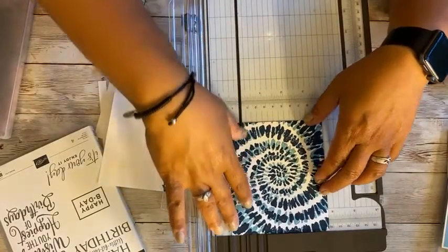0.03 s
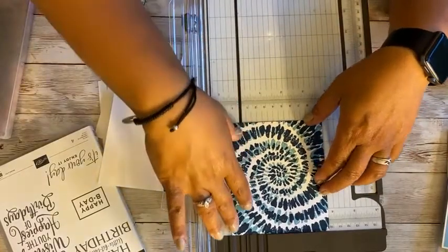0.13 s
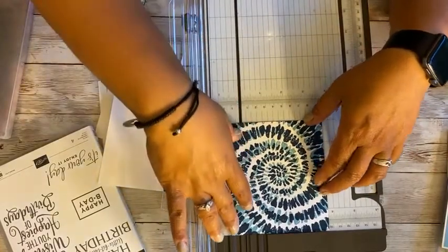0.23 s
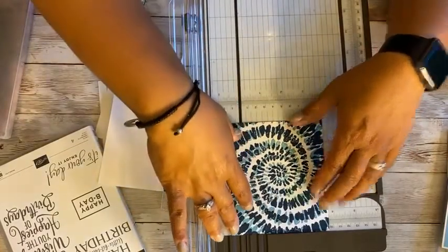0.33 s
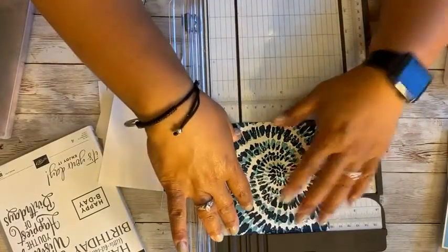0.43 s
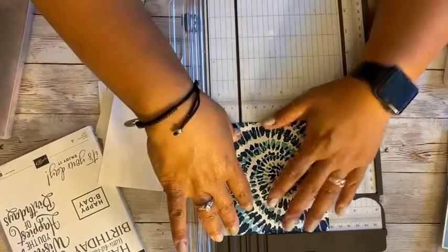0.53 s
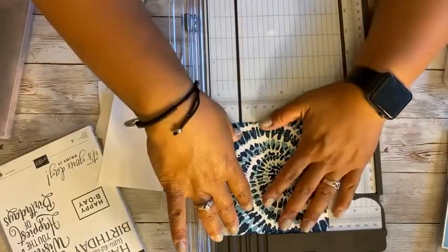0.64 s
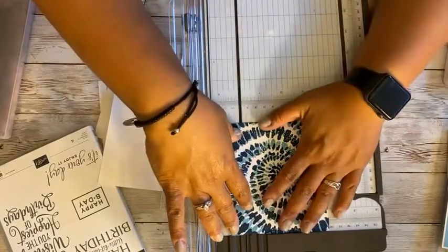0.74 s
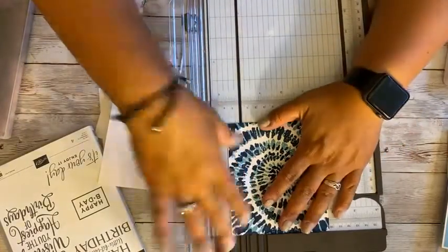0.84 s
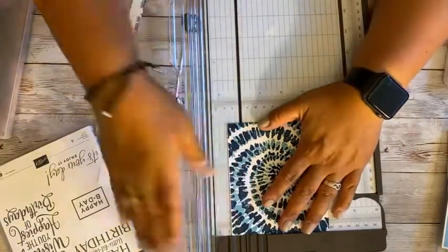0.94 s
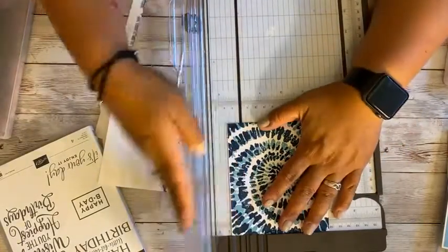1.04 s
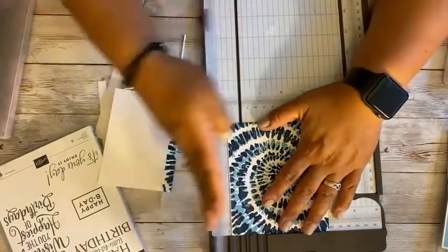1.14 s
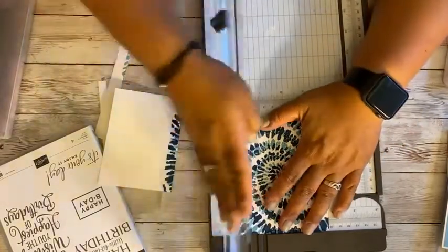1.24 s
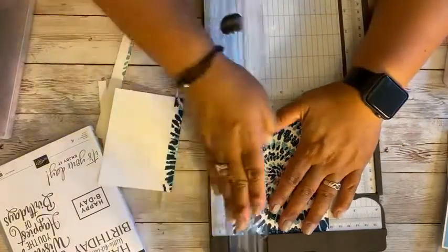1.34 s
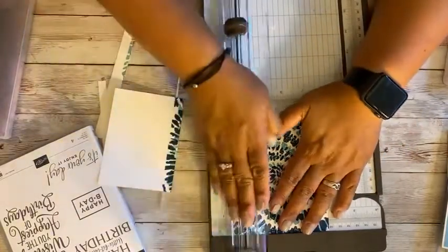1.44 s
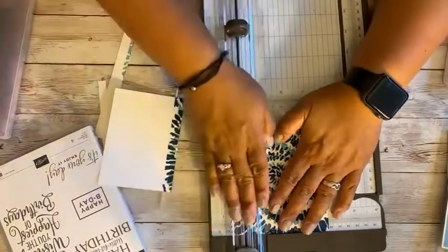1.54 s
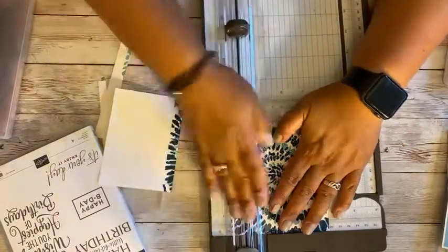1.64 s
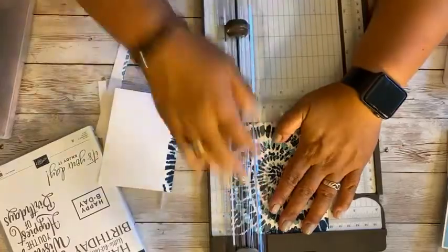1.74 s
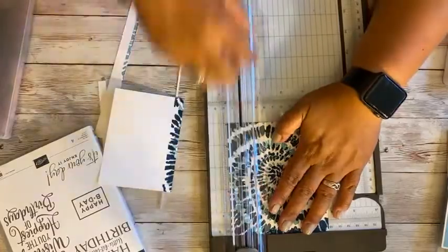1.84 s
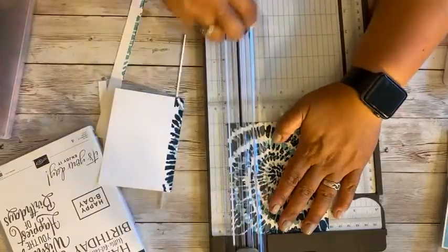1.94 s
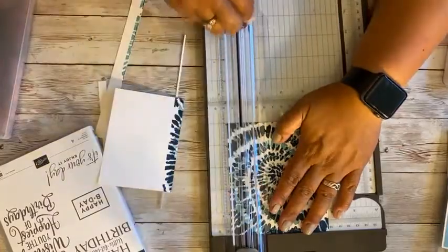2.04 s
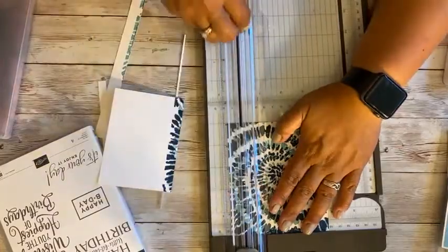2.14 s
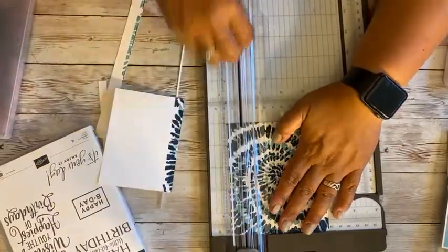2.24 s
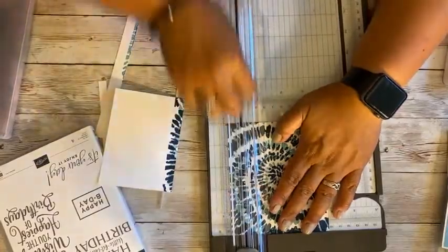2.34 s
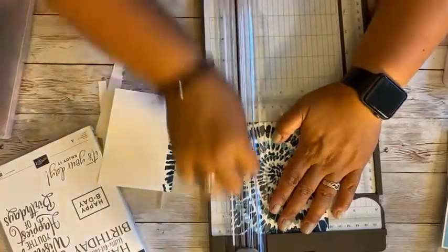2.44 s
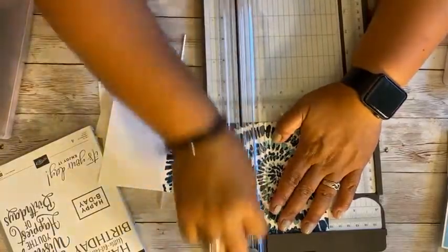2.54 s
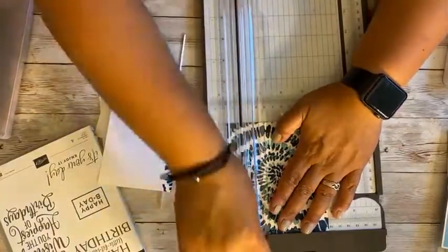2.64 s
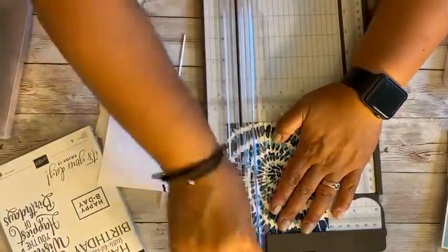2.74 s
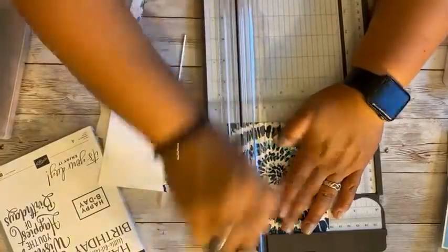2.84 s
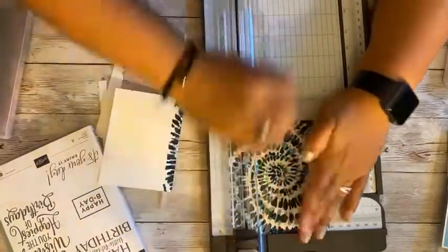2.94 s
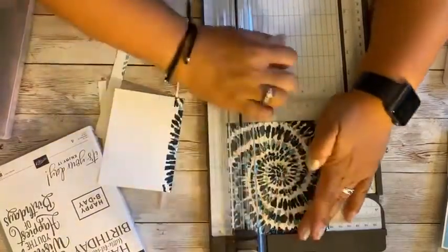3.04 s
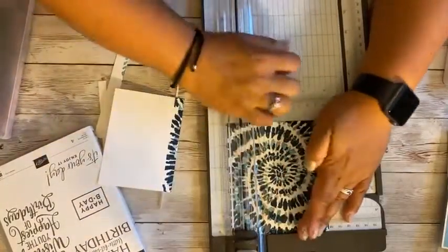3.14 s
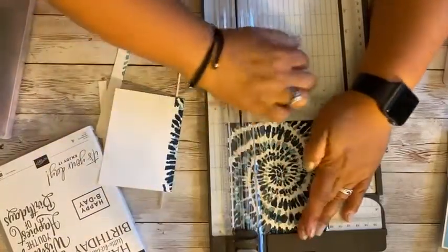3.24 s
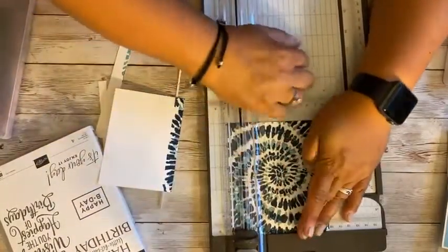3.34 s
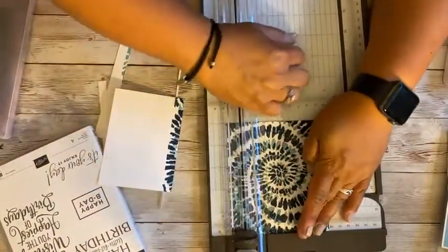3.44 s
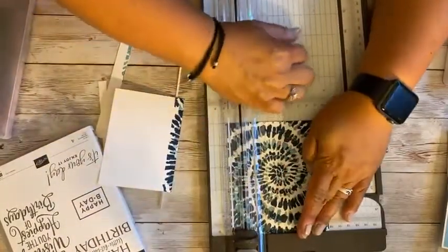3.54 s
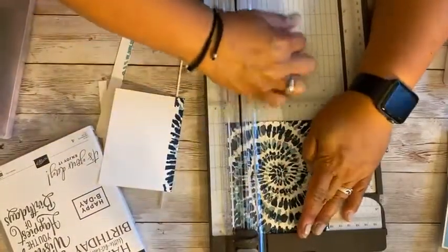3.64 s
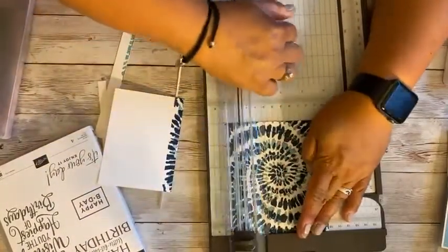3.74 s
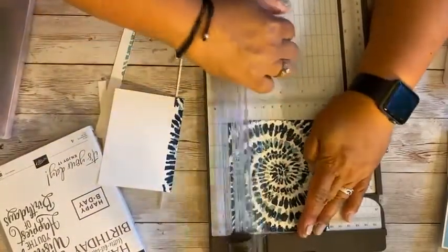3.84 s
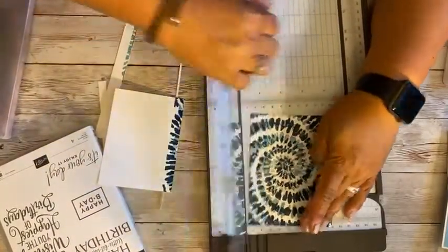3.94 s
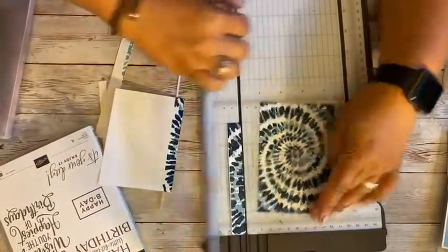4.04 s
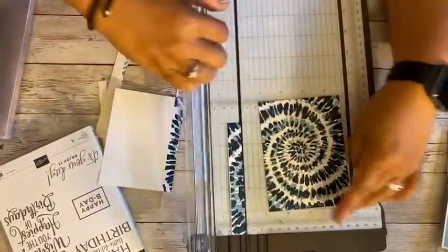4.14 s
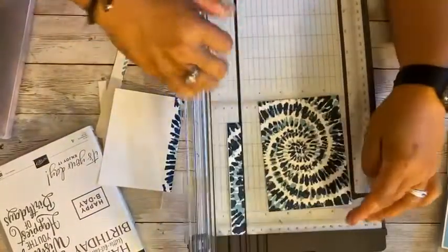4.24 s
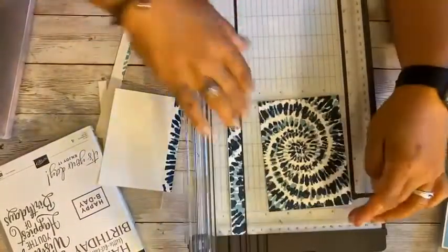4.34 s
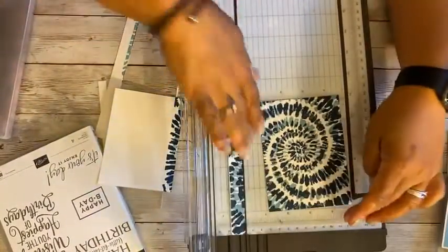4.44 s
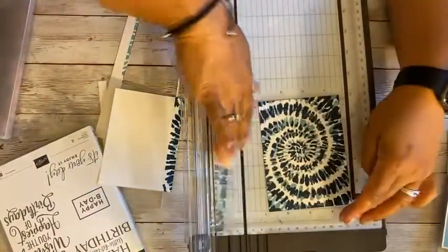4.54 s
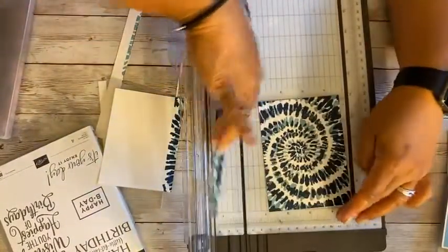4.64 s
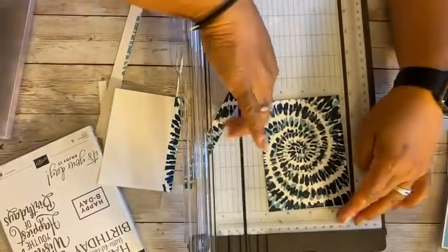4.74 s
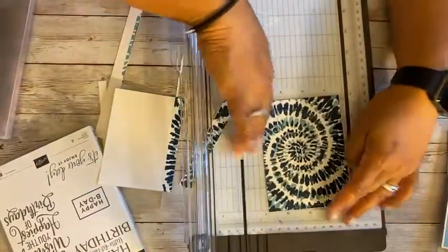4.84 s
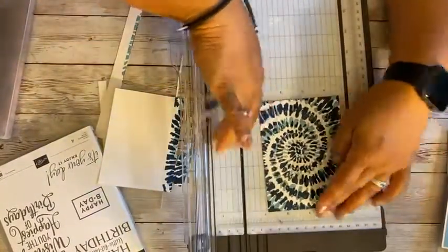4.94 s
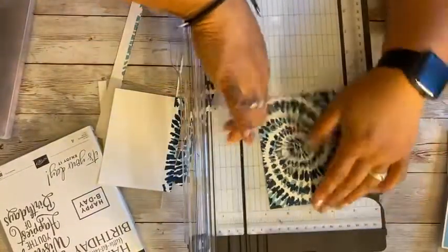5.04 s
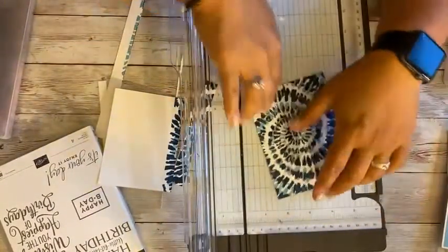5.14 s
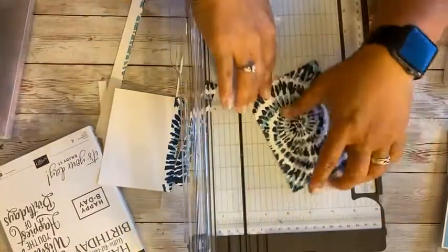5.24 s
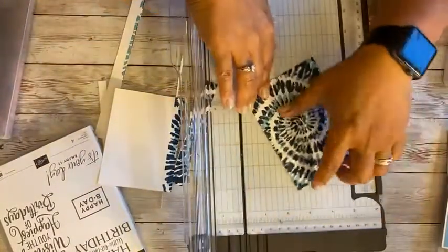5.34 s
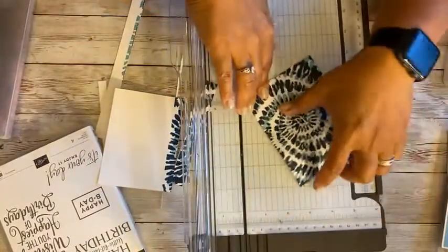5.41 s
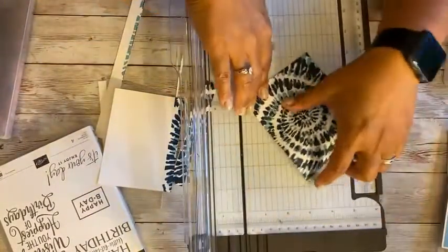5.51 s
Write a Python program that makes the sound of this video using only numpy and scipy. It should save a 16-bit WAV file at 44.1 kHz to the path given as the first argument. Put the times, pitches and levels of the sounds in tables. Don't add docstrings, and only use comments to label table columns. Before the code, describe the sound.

A plastic paper trimmer's guide arm rattles and slams down, a blade scrapes briskly through card, then plastic clacks and card rustles in a quiet room.

```python
import sys
import numpy as np
from scipy import signal
from scipy.fft import rfft, irfft
from scipy.io import wavfile
from scipy.ndimage import uniform_filter1d

SR = 44100
rng = np.random.default_rng(int(sys.argv[2]) if len(sys.argv) > 2 else 0)


def decibels_to_gain(level_db):
    exponent = np.asarray(level_db, float) / 20
    return 10 ** exponent


def transcribe(signal):
    frames = np.atleast_2d(signal).T
    limited = np.clip(frames, -1, 1)
    pcm = np.round(limited * 32767).astype(np.int16)
    wavfile.write(sys.argv[1], SR, pcm)


N = 245962


def band(x, hz, width):
    return signal.lfilter(*signal.iirpeak(min(hz, 0.45 * SR), hz / width, SR), x)


def wide_band(x, hz, width):
    return band(band(x, hz, width), hz, width)


def unit(x):
    return x / np.sqrt(np.mean(x ** 2))


def walk(rate):
    hold = int(SR / rate)
    levels = np.repeat(rng.standard_normal(N // hold + 1), hold)
    return 0.95 * uniform_filter1d(levels, hold)[:N]


def grit(per_s, spread_db):
    chance, luck = rng.random((2, N))
    size_db = np.minimum(-spread_db * np.log(1 - luck), 3 * spread_db)
    size = (chance < per_s / SR) * decibels_to_gain(size_db)
    push = size * rng.choice([-1, 1], size=(4, N))
    for lag in (5, 13):
        taps = np.r_[0.6, np.zeros(lag - 1), 1]
        push = signal.lfilter(taps, taps[::-1], push)
    return unit(push)


def body(x, modes, top_hz):
    ring, power = 0, 0
    for k, (hz, width, db) in enumerate(modes):
        ring = ring + (-1) ** k * decibels_to_gain(db) * band(x, hz, width)
        power += decibels_to_gain(db) ** 2 * np.pi * width / SR
    return signal.lfilter(*signal.butter(1, top_hz, fs=SR), ring) / np.sqrt(power)


# (frequency [Hz], width [Hz], level [dB])
BASE_MODES = [(120, 56, -1.5), (211, 45, 3), (330, 89, 0), (507, 140, -1.5), (628, 42, 4), (864, 310, -1.5)]


def trimmer(force, modes, bright_modes, hiss_hz):
    touched = body(force[0], modes, 4500)
    rim = body(force[1], bright_modes, 7300)
    edge = 0.69 * wide_band(force[2], hiss_hz, hiss_hz)
    base = body(force[3], BASE_MODES, 730)
    return touched + rim + edge + base


def strokes(rows, hiss_db, rumble_db):
    gain, t = np.zeros((4, N + SR)), np.arange(-SR // 2, SR // 2) / SR
    for s, db, swell_s, fade_s, bright_db in rows:
        under = -20 * np.maximum(-t / swell_s, t / fade_s)
        hiss = 0.83 * under + hiss_db + 1.5 * bright_db
        rumble = 0.71 * under + rumble_db - 0.15 * bright_db
        start = int(s * SR)
        gain[:, start:start + SR] += decibels_to_gain(db + np.array([under, under + bright_db, hiss, rumble]))
    return gain[:, SR // 2:SR // 2 + N]


# (frequency [Hz], width [Hz], level [dB])
SLIDE_MODES = [(3180, 970, 3.5), (4540, 2700, 6), (6660, 13000, -4)]


def scrape(gain, modes, hiss_hz, per_s, spread_db, flicker_db):
    force = gain * grit(per_s, spread_db) * decibels_to_gain(flicker_db * walk(70))
    return trimmer(force, modes, SLIDE_MODES, hiss_hz)


def rings(blows, push_s):
    out, t = np.zeros(N + SR), np.arange(SR // 4) / SR
    for s, db, hz, t60, partner_db in blows:
        push = rng.standard_normal(len(t)) * t * np.exp(-t / push_s)
        width = np.log(1000) / (np.pi * t60)
        ring = band(push, hz, width)
        ring += decibels_to_gain(partner_db) * band(push, 0.74 * hz, width)
        ring += 0.65 * band(push, 1.2 * hz, width)
        start = int((s - push_s / 2) * SR)
        out[start:start + len(t)] += decibels_to_gain(db) * ring / np.abs(ring).max()
    return out[:N]


# (frequency [Hz], level per Hz [dB])
HUM_COLOUR = [(15, -61), (25, -41.5), (55, -4.5), (113, -3.5), (193, -4.5), (240, -4.5), (411, -9),
              (704, -11), (805, -13), (946, -14.5), (2240, -23), (5740, -23.5), (15500, -38)]
# (time [s], level [dB])
HUM_DUCKING = [
    (0, 0.9),
    (1.55, 2.4),
    (1.902, -0.5),
    (2.45, 3.5),
    (3.05, 3.5),
    (4.449, 1),
    (5.58, 2.5),
]


def hum():
    hz, db = np.transpose(HUM_COLOUR)
    f = np.arange(N // 2 + 1) * SR / N + 1
    colour = decibels_to_gain(np.interp(np.log(f), np.log(hz), db))
    air = irfft(rfft(rng.standard_normal(N)) * colour, N)
    waver = band(air, 200, 500) * (decibels_to_gain(1.5 * walk(6)) - 1)
    ducking = np.interp(np.arange(N) / SR, *np.transpose(HUM_DUCKING))
    return decibels_to_gain(-70.5 + ducking) * unit(air + waver)


# (crest time [s], peak level [dB], swell [s], fade [s])
FINGER_WHISKS = [
    (.13, -77, .05, 0.14),
    (1.8, -65.5, 0.041, 0.06),
    (2.075, -68.5, .03, 0.055),
    (2.6, -64.5, 0.12, 0.19),
    (3.69, -57.5, .02, 0.032),
    (4.11, -76, .1, 0.17),
    (4.648, -66.5, 0.124, 0.072),
    (5.045, -74, 0.022, .04),
    (5.135, -69, .05, .06),
]


def whisks():
    gain = strokes([(*whisk, 0) for whisk in FINGER_WHISKS], 0, 0)[0]
    hiss = wide_band(rng.standard_normal(N), 11300, 13000)
    return gain * unit(hiss) * decibels_to_gain(2.0 * walk(40))


# (frequency [Hz], width [Hz], level [dB])
CARD_MODES = [(1236, 490, 6.3), (2040, 1510, 5)]
# (crest time [s], peak level [dB], swell [s], fade [s], brightness [dB])
CARD_RUSTLES = [(.146, -74.5, 0.093, 0.084, 8.5), (.25, -79.5, 0.16, 0.5, -5), (.76, -81.5, .03, .05, 8),
                (.914, -75.5, 0.053, 0.028, 9), (1.032, -81, 0.04, 0.054, 9.5),
                (1.745, -71, .02, 0.0466, 8), (1.792, -59.5, 0.037, 0.067, 1.5),
                (4.035, -62.5, 0.045, 0.066, -13), (4.105, -64.5, 0.11, 0.077, 3.5),
                (4.165, -63, 0.057, .12, -9), (4.262, -56.5, 0.0417, 0.068, -3),
                (4.335, -62, 0.09, 0.058, -14), (4.606, -70, 0.034, 0.054, 5.5),
                (4.648, -73.5, 0.037, 0.058, 10.5), (4.69, -58.5, 0.043, 0.035, -37),
                (4.81, -76, 0.278, 0.14, 5.5), (5.038, -58.5, 0.025, 0.047, 0.5),
                (5.108, -69.5, 0.059, .07, 0), (5.14, -77.5, .03, 0.045, 7), (5.3, -71, 0.094, 0.14, -2),
                (5.4, -76, 0.0099, .03, -16), (5.435, -80, 0.056, 0.041, -16.5),
                (5.47, -84, 0.13, .2, 11.5), (5.545, -66, 0.05, 0.23, 4.5)]


def rustles():
    gain = strokes(CARD_RUSTLES, hiss_db=-10.5, rumble_db=-3)
    return scrape(gain, CARD_MODES, hiss_hz=8856, per_s=5000, spread_db=4.0, flicker_db=3.0)


# (time [s], peak level [dB], ring [Hz], ring t60 [s])
CARD_FLICKS = [(.9158, -68, 1384, 0.04), (1.21, -46, 1950, 0.017), (1.598, -21, 4510, .01),
               (1.606, -24.5, 5300, 0.013), (1.597, -24, 1710, .015), (1.7885, -48, 1070, 0.018),
               (2.1813, -52, 1170, .021), (2.2687, -66.5, 1020, 0.024), (2.7462, -30.5, 3860, 0.021),
               (2.9073, -39.5, 1320, 0.0087), (3.4057, -61, 6350, .012), (3.464, -59.5, 6470, 0.0103),
               (3.481, -65, 6300, .012), (3.553, -46.5, 930, .012), (3.683, -39.5, 3320, 0.0103),
               (3.857, -36.5, 1360, 0.049), (3.934, -49, 3300, .007), (4.0344, -53, 1710, 0.011),
               (4.0744, -55, 1720, 0.047), (4.1044, -54.5, 2200, 0.027), (4.152, -54, 1900, 0.047),
               (4.1794, -59, 1970, .025), (4.3218, -55, 1250, 0.056), (4.5954, -53.5, 1950, 0.016),
               (5.0335, -53.5, 1410, .025)]


def flicks():
    return rings([(*flick, -18) for flick in CARD_FLICKS], push_s=0.0045)


# (frequency [Hz], width [Hz], level [dB])
ARM_MODES = [(850, 150, 3), (926, 240, 4), (1432, 1340, 7.5), (1725, 1300, -3.5), (2100, 1400, -11)]
RAIL_MODES = [(2820, 1700, -7), (3487, 530, 3), (3960, 460, 4), (4410, 670, 5), (5400, 880, 3.5),
              (6650, 2700, -2)]
# (time [s], arm peak level [dB], base share [dB], rail share [dB], dying t60 [s])
ARM_TAPS = [(1.1603, -45.5, -29, -23, 0.44), (1.3468, -56, 6.5, -10, 0.122), (1.585, -34.5, -9.5, -1, 0.23),
            (2.05, -52.5, -8, -10.5, 0.145), (2.1812, -62, -17.5, -15, 0.12), (2.7385, -35.5, -2, 7, 0.21),
            (2.8965, -44.5, -3, 0, 0.23), (3.1301, -46.5, 7, -4.5, 0.246), (3.279, -43.5, -9, -10, 0.27),
            (3.5474, -40.5, -3, -12.5, 0.13), (3.6229, -50.5, 0.5, -11, 0.68),
            (3.673, -37, -9.5, -1.5, 0.18), (4.2576, -48, -18.5, -21, 0.18), (4.586, -57, -18, -8, .15),
            (4.678, -51, -8, -4.5, .12), (5.0335, -55.5, -8.5, -7, .12), (5.096, -60, -10, -9, 0.18)]
ARM_LANDINGS = [
    (1.574, -30, -6, -1, 0.26),
    (1.588, -21.5, -5.5, 2.5, .12),
    (1.772, -47.5, -7.5, 1, 0.13),
    (2.044, -45, 1.5, -1.5, 0.23),
]


def clacks():
    force, t = np.zeros((4, N + SR)), np.arange(SR // 2) / SR
    for blows, rise_s in ((ARM_TAPS, 0.0032), (ARM_LANDINGS, 0.0258)):
        for s, db, base_db, rail_db, t60 in blows:
            rise = np.minimum(t / rise_s, 1) ** 2
            decay = decibels_to_gain(-60 * np.maximum(t - rise_s, 0) / t60)
            shares = decibels_to_gain([[0], [rail_db], [rail_db - 24.5], [base_db]])
            start = int((s - 0.003) * SR)
            force[:, start:start + len(t)] += decibels_to_gain(db - 4.0) * shares * rise * decay
    edge_lag_s = 0.006
    lag = np.exp(-1 / (edge_lag_s * SR))
    force[2] = signal.lfilter([1 - lag], [1, -lag], force[2])
    force = force[:, :N] * grit(per_s=8000, spread_db=2.0) * decibels_to_gain(0.66 * walk(180))
    return trimmer(force, ARM_MODES, RAIL_MODES, 8000)


# (crest time [s], peak level [dB], swell [s], fade [s], brightness [dB])
PLASTIC_DRAGS = [(1.17, -49.5, 0.0058, 0.24, -13), (1.201, -55, 0.057, 0.055, -7),
                 (1.26, -59.5, .04, 0.0167, -8), (1.3, -89, .05, 0.057, -12.5),
                 (1.35, -84, 0.0195, 0.049, 20), (1.552, -69, 0.03, 0.12, 6.5),
                 (2.09, -70, .01, 0.081, 2.5), (2.182, -62, 0.063, 0.076, -43), (2.27, -82, 0.069, .1, -13),
                 (3.29, -44.5, 0.005, 0.12, -3.5), (3.344, -52.5, 0.036, 0.055, -20),
                 (2.69, -61, 0.11, 0.13, -33), (3.54, -63, 0.113, 0.0149, -3),
                 (3.602, -59.5, 0.12, 0.29, -5), (3.74, -84.5, 0.0134, 0.18, -9.5),
                 (3.8, -52, 0.021, 0.16, -14), (3.862, -42, 0.076, 0.074, -3), (3.94, -67, 0.027, 0.11, 4),
                 (3.46, -70, 0.017, 0.12, -2)]


def drags():
    gain = strokes(PLASTIC_DRAGS, hiss_db=-22.5, rumble_db=-8)
    return scrape(gain, ARM_MODES, hiss_hz=7500, per_s=7000, spread_db=3.0, flicker_db=3.1)


# (time [s], peak level [dB], frequency [Hz])
TABLE_BOOMS = [(1.187, -58, 98), (1.601, -64, 86.8), (1.603, -45.5, 216), (2.751, -76, 88),
               (3.13, -55, 218), (3.68, -65, 111.5), (3.851, -68, 89), (4.998, -64.5, 96.7),
               (3.331, -66, 96), (3.79, -61, 170), (4.69, -67, 110), (5.299, -66, 132), (2.505, -59.5, 192)]


def booms():
    out, t = np.zeros(N + SR), np.arange(SR // 4) / SR
    for s, db, hz in TABLE_BOOMS:
        swell = t * hz / 3 * np.exp(1 - t * hz / 3)
        swing = np.sin(2 * np.pi * hz * t) + 0.31 * np.sin(2 * np.pi * 0.3 * hz * t)
        start = int(s * SR)
        out[start:start + len(t)] += decibels_to_gain(db) * swell * swing
    return out[:N]


# (time [s], peak level [dB], ring [Hz], ring t60 [s], lower partner level [dB])
BASE_KNOCKS = [(1.188, -73.5, 113, 0.06, -12.5), (1.6, -24, 588, 0.02, -41), (2.062, -50, 620, 0.06, -18.5),
               (2.747, -42, 476, 0.079, -5), (3.132, -35, 658, 0.038, -13),
               (3.331, -36.5, 378.7, 0.13, -12), (2.748, -38, 290, 0.066, -8),
               (3.681, -49.5, 490, 0.11, -16), (3.829, -45.5, 600, 0.078, -27.5),
               (4.254, -46, 185, 0.028, -7), (4.678, -48, 230, 0.139, 4), (4.971, -56, 129, 0.076, -10),
               (5.287, -52, 132, 0.018, -9.5), (5.42, -55, 750, 0.03, 0), (3.133, -38, 377, 0.091, -7),
               (3.155, -48, 427, 0.051, 1), (3.8, -52, 194.4, .12, -20), (4.785, -59.5, 281, 0.054, -9),
               (5.435, -52.5, 249, 0.054, -3), (4.995, -55, 167, 0.098, -14.5)]


def knocks():
    return rings(BASE_KNOCKS, push_s=0.004)


SLAM_CRACK_S = [
    1.603,
    1.6093,
    1.616,
]
SLAM_CRACK_DB = [-19, -15, -19]


def slam_cracks():
    cracks = np.zeros(N)
    cracks[(np.array(SLAM_CRACK_S) * SR).astype(int)] = -decibels_to_gain(np.array(SLAM_CRACK_DB))
    return 5.5 * wide_band(cracks, 3000, 6000)


# (frequency [Hz], width [Hz], level [dB])
BLADE_MODES = [(1300, 1430, -25), (1850, 280, -16.5), (2170, 630, -26)]
# (time [s], pressure level [dB], rail share [dB])
BLADE_CUT = [
    (2.44, -82.5, 13),
    (2.496, -68, 7),
    (2.512, -46, -0.5),
    (2.562, -47, 4.5),
    (2.63, -48.5, 5),
    (2.698, -50, 5.5),
    (2.736, -52, 10.5),
    (2.767, -64, 14),
]


def cut():
    t = np.arange(N) / SR
    s, db, rail_db = np.transpose(BLADE_CUT)
    on = np.clip(np.minimum(t - s[0], s[-1] - t) / 0.0033, 0, 1)
    pressure = on * decibels_to_gain([np.interp(t, s, db + share_db) for share_db in (0, rail_db, -1.5, -9)])
    return scrape(pressure, BLADE_MODES, hiss_hz=7680, per_s=14000, spread_db=4.5, flicker_db=0.95)


def room(x):
    t60, level_db = 0.14, -9
    t = np.arange(SR // 2) / SR
    tail = rng.standard_normal(len(t)) * (t > 0.004)
    dull = signal.lfilter([0.3], [1, -0.7], tail)
    treble = 0.4 * (tail - dull)
    tail = dull * decibels_to_gain(-60 * t / t60) + treble * decibels_to_gain(-60 * t / (1.38 * t60))
    return x + decibels_to_gain(level_db) * signal.fftconvolve(x, tail / np.sqrt(np.sum(tail ** 2)))[:N]


def scene():
    plastic = rustles() + flicks() + clacks() + drags() + knocks() + slam_cracks() + cut()
    plastic = signal.lfilter(*signal.butter(2, 86, "high", fs=SR), plastic)
    return np.tile(room(plastic + booms() + whisks()) + hum(), (2, 1))


def band_limit(x):
    return signal.sosfilt(signal.butter(12, 15690, fs=SR, output="sos"), x)


def record(dry):
    return band_limit(dry)


dry = scene()
out = record(dry)
transcribe(out)
```